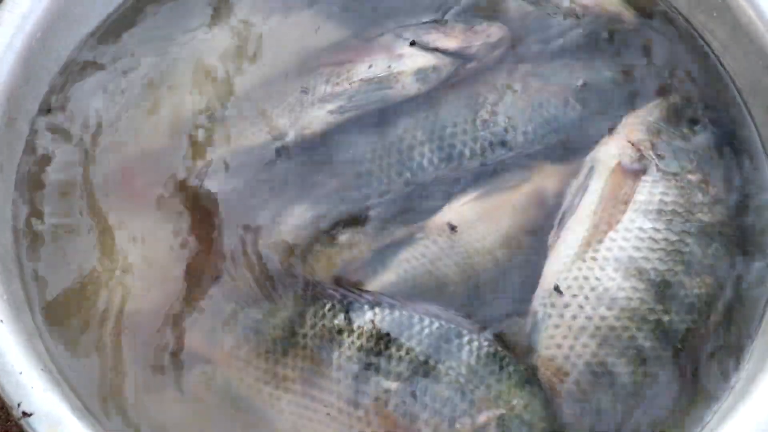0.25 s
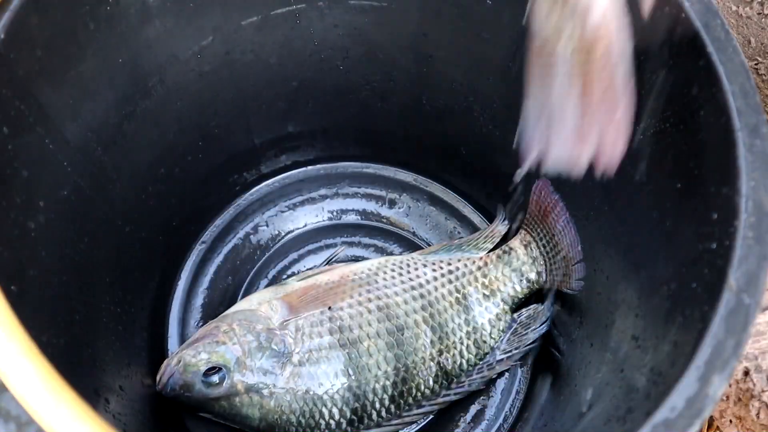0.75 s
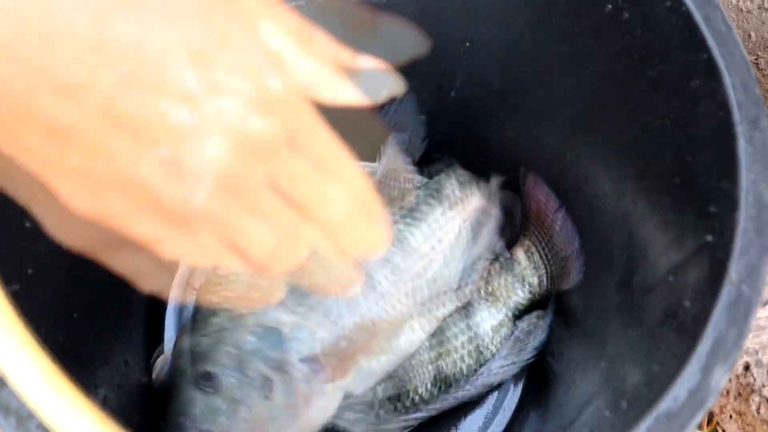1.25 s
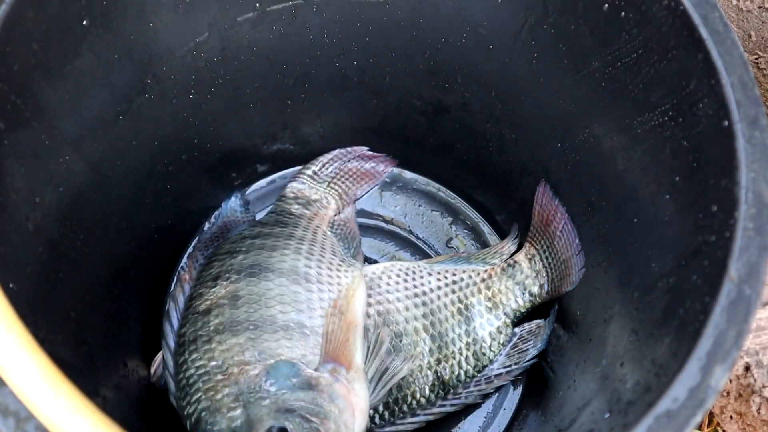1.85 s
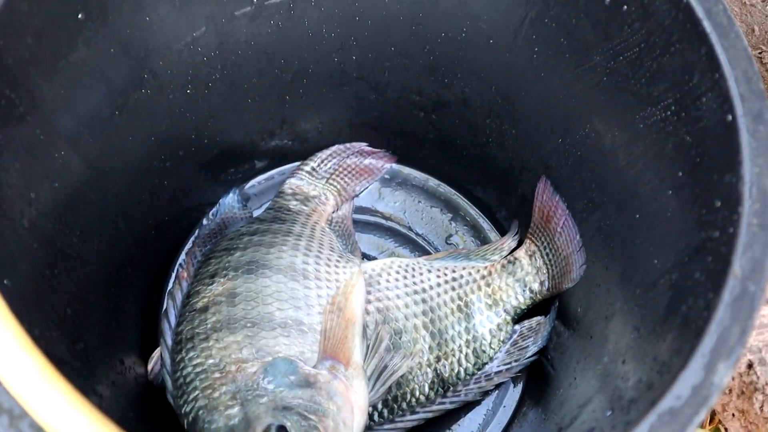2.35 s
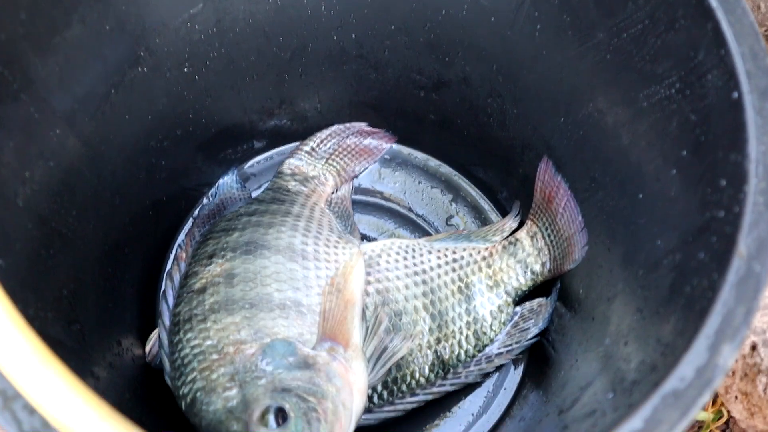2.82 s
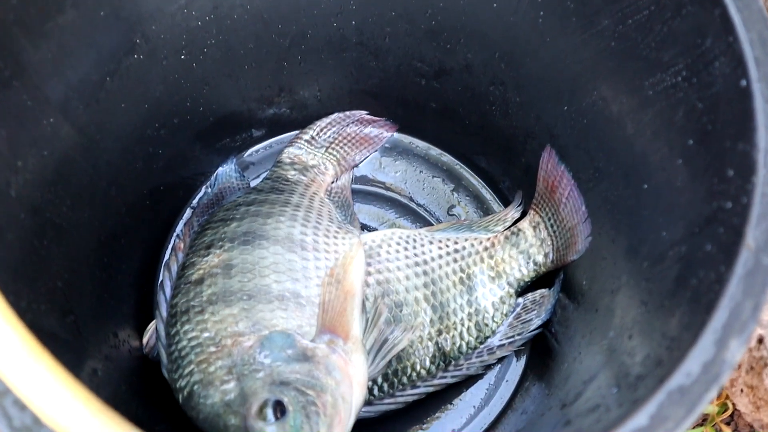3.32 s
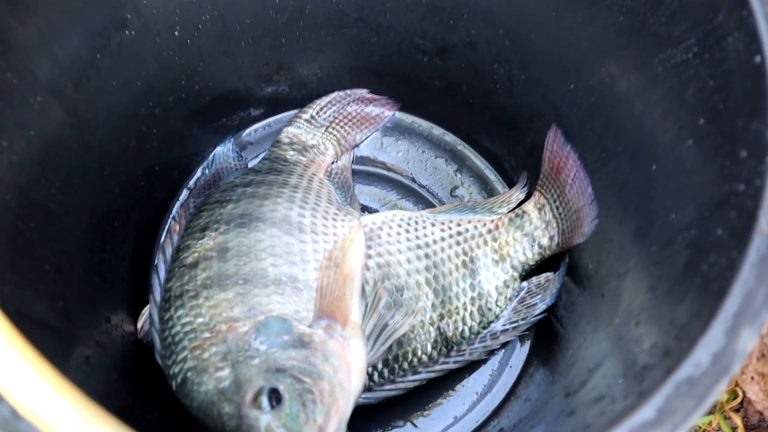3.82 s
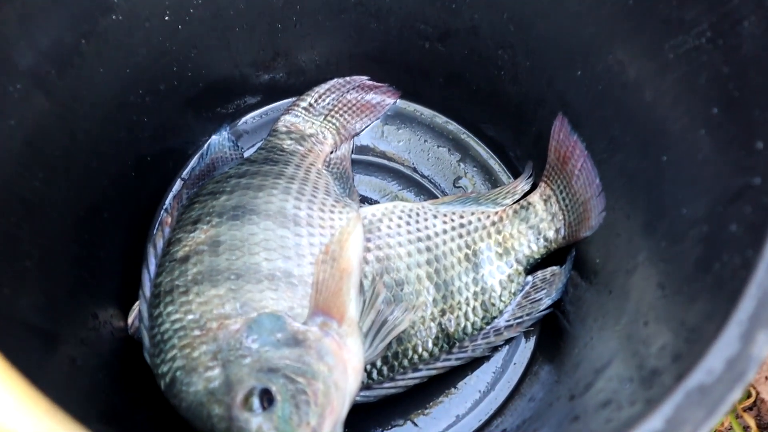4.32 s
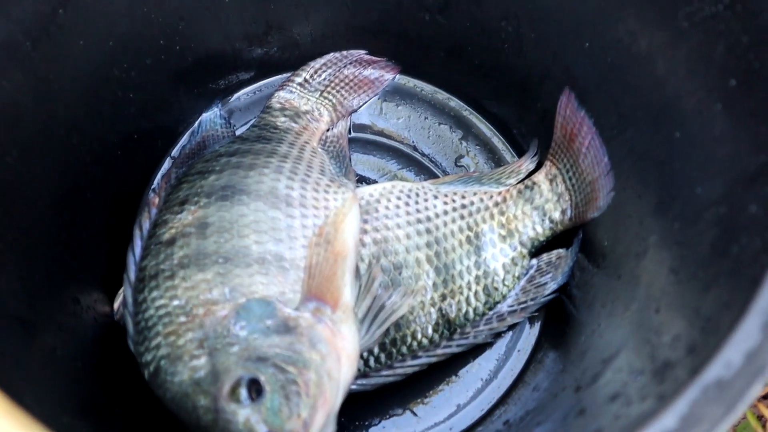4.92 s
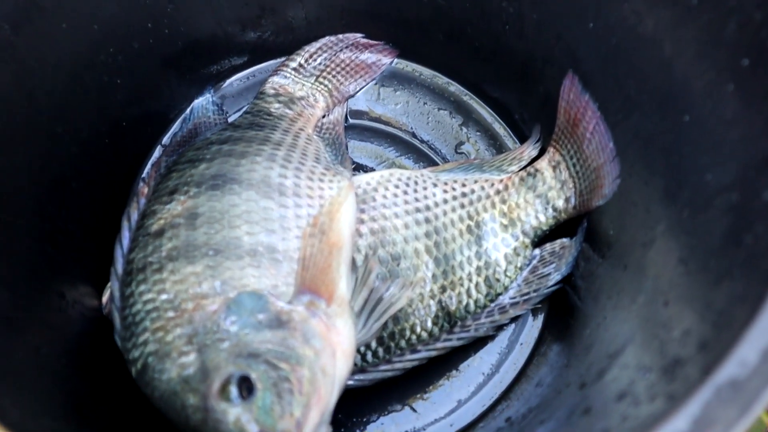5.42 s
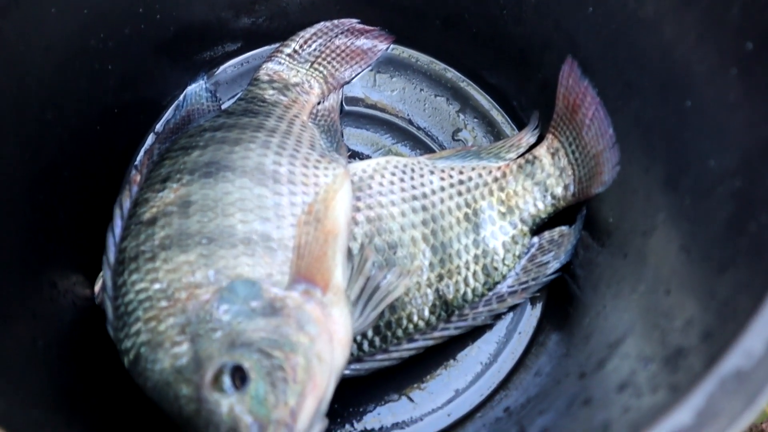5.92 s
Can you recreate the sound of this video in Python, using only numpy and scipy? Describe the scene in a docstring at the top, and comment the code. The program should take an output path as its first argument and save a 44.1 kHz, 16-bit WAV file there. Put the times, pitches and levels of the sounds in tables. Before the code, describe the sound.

Close stereo microphone over live fish outdoors. Soft rumble and hiss stay underneath. After a nearly quiet start with a fading whine, slimy froth leads to one heavy wet slap on a plastic bucket bottom, briefly hollow and ringing. Then come sparse sticky lip smacks, sputtering suction, little rising bubble plinks and crisp prickles, with a strong juicy squelch midway and another wet smack near the end.

```python
"""Outdoors a low rumble and a thin hiss (filtered noise) run throughout; a thin whine soon fades. Live fish
in a basin smack faintly, then the scene cuts to a wet plastic bucket: slime sucks (gated froth), small
bubbles plink or rise (gliding sines). A fish slithers in onto another, slaps the bottom (modes, splatter,
bursting water) and bounces. Then gills and mouths smack (resonated clicks), squelch, suck air and prickle;
late on comes another wet slap."""
import sys
import numpy as np
from scipy import signal
from scipy.fft import rfft, irfft, next_fast_len
from scipy.io import wavfile
from scipy.ndimage import uniform_filter1d

SR = 44100
rng = np.random.default_rng(int(sys.argv[2]) if len(sys.argv) > 2 else 0)


def master_out(mix):
    """Clip the mix to full scale and print it as 16-bit PCM to the path in sys.argv[1]."""
    frames = np.transpose(np.atleast_2d(mix))
    ceiling = np.clip(frames, -1, 1)
    pcm = np.round(ceiling * 32767).astype(np.int16)
    wavfile.write(sys.argv[1], SR, pcm)


N = 272097
T = np.arange(N) / SR
SHORT = T[:SR // 2]
CUT_S = 0.73  # cut from the basin to the bucket


def undb(db):
    """Decibels to gain."""
    return 10 ** (np.asarray(db) / 20)


def unit(x):
    """Scale to rms 1."""
    return x / np.sqrt(np.mean(x ** 2))


def over_bins(points, size):
    """Interpolate a (Hz, value) table over log frequency at every FFT bin."""
    hz, value = np.transpose(points)
    return np.interp(np.log(np.fft.rfftfreq(size, 1 / SR) + 1), np.log(hz), value)


def colour(x, points):
    """Minimum-phase filter from a (Hz, dB) table: causal, so attacks stay sharp."""
    size = next_fast_len(x.shape[-1] // 2 + 4096) * 2
    cepstrum = irfft(np.log(undb(over_bins(points, size))))
    cepstrum[1:size // 2] *= 2
    cepstrum[size // 2 + 1:] = 0
    response = np.exp(rfft(cepstrum))
    return irfft(rfft(x, size) * response)[..., :x.shape[-1]]


def lowpass(x, order, hz):
    """Butterworth low-pass."""
    return signal.lfilter(*signal.butter(order, hz, fs=SR), x)


def highpass(x, hz):
    """First-order high-pass."""
    return signal.lfilter(*signal.butter(1, hz, "high", fs=SR), x)


def resonate(x, hz, width_hz):
    """One resonance, gain 1 at its centre; centre and width stop at SR / 3."""
    hz = min(hz, SR / 3)
    return signal.lfilter(*signal.iirpeak(hz, hz / min(width_hz, SR / 3), fs=SR), x)


def fade(t60_s):
    """Exponential decay, 60 dB in t60_s."""
    return np.exp(-np.log(1000) * SHORT / t60_s)


def crackle(count, rate_hz, spread_db):
    """Random tiny clicks of uneven size and sign, rms 1."""
    sizes = undb(spread_db * np.minimum(rng.exponential(size=count), 4))
    signs = rng.choice([-1, 1], count)
    return unit(signs * sizes * (rng.random(count) < rate_hz / SR))


def add(out, start_s, x):
    """Mix x into out from start_s."""
    start = int(start_s * SR)
    out[start:start + len(x)] += x[:N - start]


def ports(x, lead):
    """Two microphone ports: the left leads the right by a frequency-dependent phase."""
    turn = np.exp(.5j * over_bins(lead, N) * np.array([[1], [-1]]))
    return irfft(rfft(x) * turn, N)


def air(spectrum, db, flutter_db=-0.44, diffuse=0.74):
    """Outdoor noise: an unsteady rumble alike at both ports under a partly diffuse hiss."""
    # left port's lead on the background: (frequency [Hz], phase [rad])
    far_lead = [(40, .05), (200, .3), (430, 1.5), (900, 2.1), (1800, 1.8), (3000, 2.3), (5000, 2.7),
                (9000, 3.0)]
    apart = highpass(rng.standard_normal((2, N)), 450)
    noise = ports(rng.standard_normal(N), far_lead) + diffuse * apart
    knots_s = np.linspace(0, T[-1], 90)
    flutter = undb(flutter_db * np.interp(T, knots_s, rng.standard_normal(len(knots_s))))
    sound = unit(colour(noise, spectrum))
    rumble = lowpass(sound, 1, 300)
    return undb(db) * (sound + (flutter - 1) * rumble)


def insect(start_hz=4250, rise_hz=260, width_hz=60, db=-60.5, fade_s=0.31):
    """A thin whine, a noise-modulated sine, creeps upward and fades."""
    noise = rng.standard_normal((2, N))
    band = signal.sosfilt(signal.butter(2, width_hz / 2, fs=SR, output="sos"), noise)
    hz = start_hz + rise_hz * np.minimum(T / CUT_S, 1)
    carrier = np.sin(2 * np.pi * np.cumsum(hz) / SR)
    return undb(db) * unit((1 + unit(band)) * carrier) * np.exp(-(T / fade_s) ** 2)


def snap(hz, width_hz, t60_s, crackle_share):
    """A film breaks with a click and tears on in smaller ones; the cavity colours them. Peak 1."""
    tear = crackle_share * crackle(len(SHORT), rate_hz=7000, spread_db=3.5) * fade(t60_s)
    tear[0] = 1
    stage_hz = 0.86 * width_hz
    x = resonate(resonate(tear, hz, stage_hz), hz, stage_hz)
    return x / np.abs(x).max()


def smacks(trim_db=5, tear_cycles=215):
    """Slime films snap as lips and gill covers part; bigger cavities tear on longer."""
    # slime films: (time [s], level before trim [dB], cavity [Hz], width before snap's narrowing [Hz])
    films = [(.278, -44.5, 2330, 1200), (0.56, -41, 2160, 900), (1.013, -32, 3400, 2500),
             (1.021, -32, 2420, 2000), (1.074, -34, 3140, 1800), (1.367, -18, 5970, 2200),
             (1.37, -31, 2680, 1000), (1.3827, -33, 5550, 2200), (1.400, -17, 4370, 2000),
             (1.452, -22.5, 1960, 3480), (2.243, -29, 2310, 2100), (2.413, -13.5, 2310, 1890),
             (2.478, -26, 2610, 3420), (2.668, -32, 1990, 2980), (3.321, -30.5, 2400, 2400),
             (3.389, -29, 3200, 1100), (3.456, -38, 2000, 2200), (3.511, -33, 3260, 1500),
             (3.614, -29.5, 1730, 1390), (3.708, -32, 2100, 905), (4.948, -31, 1530, 1400),
             (5.108, -37.5, 2740, 1008), (5.142, -24.5, 4970, 3020), (5.162, -13, 7360, 5900),
             (5.167, -22, 3500, 2180), (5.391, -29.5, 4550, 1200), (6.115, -34.5, 2650, 900)]
    out = np.zeros(N)
    for start_s, db, hz, width_hz in films:
        add(out, start_s, undb(db + trim_db) * snap(hz, width_hz, tear_cycles / hz, crackle_share=0.083))
    return out


def suction(sputter_db=1.0, seep_db=-63, bright_hz=2180):
    """Air sputters through a wet slit as froth and ringing tiny bubbles; a little seeps between strokes."""
    # colour of the hollow behind the slit: (frequency [Hz], level [dB])
    gill = [(200, -14.5), (450, -15.5), (720, -11.5), (1150, -7), (1800, 4.5), (2150, -0.5), (2650, -8),
            (3300, -2), (4600, -9), (7000, -11.5), (10500, -11.5), (12300, -19), (15000, -51)]
    # gill and skin strokes, tighter slits brighter:
    # (time [s], attack [s], hold [s], level [dB], gain on the bright part [dB])
    strokes = [(0.757, 0.044, 0.016, -51, -5), (0.895, 0.066, 0.13, -44.5, -1),
               (1.201, 0.035, 0.081, -36.5, 2), (1.44, 0.026, 0.051, -49, -8),
               (1.874, 0.085, 0.066, -40, -7), (2.234, 0.0041, 0.083, -38.5, 2),
               (2.412, 0.006, 0.12, -33, -3), (2.66, 0.044, 0.048, -47.5, 0),
               (3.045, 0.13, 0.018, -44.5, -1), (3.293, 0.067, 0.11, -41.5, -6.5),
               (3.722, 0.15, 0.048, -40.5, -5), (4.04, .03, 0.075, -48, 2.5),
               (4.938, 0.022, 0.024, -49, 2.5), (5.172, 0.011, 0.043, -44.5, 7),
               (5.235, 0.0096, 0.083, -28.5, -0.5), (5.317, 0.093, 0.072, -33.5, 0),
               (5.497, 0.048, 0.038, -37.5, -1.5), (5.642, 0.19, 0.045, -40, -6)]
    blips = sum(resonate(crackle(N, rate_hz=90, spread_db=2.0), hz, hz / 12)
                for hz in np.geomspace(1200, 9000, 18))
    fine = unit(colour(crackle(N, rate_hz=9000, spread_db=2.0), gill))
    froth = unit(fine + .5 * unit(colour(blips, gill)))
    sputter = undb(sputter_db * unit(uniform_filter1d(rng.standard_normal(N), size=700)))
    dull = lowpass(froth, 1, bright_hz)
    bright = froth - dull
    dull_power = bright_power = undb(seep_db) ** 2 * (T > CUT_S)
    for start_s, attack_s, hold_s, db, bright_db in strokes:
        flow = undb(db) * stroke(start_s, attack_s, hold_s)
        dull_power = dull_power + flow ** 2
        bright_power = bright_power + (undb(bright_db) * flow) ** 2
    return sputter * (dull * np.sqrt(dull_power) + bright * np.sqrt(bright_power))


def stroke(start_s, attack_s, hold_s, sag_db_per_s=47, release_db_per_s=253):
    """Air flow of one stroke: builds, slackens, then the slit closes and adds the release to the sag."""
    held_s = np.maximum(T - start_s - attack_s, 0)
    loss_db = sag_db_per_s * held_s + release_db_per_s * np.maximum(held_s - hold_s, 0)
    return np.clip((T - start_s) / attack_s, 0, 1) * undb(-loss_db)


def bubble(start_hz, end_hz, length_s, waver=0.046, damping=1.0):
    """A pocket of air rings, wavering and gliding as its size changes."""
    age = np.linspace(0, 1, int(length_s * SR))
    wobble = unit(uniform_filter1d(rng.standard_normal(2048), size=60))
    hz = start_hz * (end_hz / start_hz) ** age * (1 + waver * np.resize(wobble, len(age)))
    swell = np.minimum(age / 0.13, 1) * np.exp(-damping * age) * np.minimum((1 - age) / 0.071, 1)
    return swell * np.sin(2 * np.pi * np.cumsum(hz) / SR)


def tick(hz):
    """A scale or fin ray comes unstuck: a very short snap. Peak 1."""
    return snap(hz, 0.94 * hz, t60_s=0.027, crackle_share=0.17)


def prickle(quiet_db=-46, range_db=8, cycles=22, glide=1.114, low_hz=2100, octaves=2.5,
            tick_share=0.38, tick_low_hz=4500, tick_db=4):
    """Pinhead bubbles burst in slime as short upward blips among small ticks; most are faint."""
    # how busy the slime is: (time [s], rate [events/s])
    busyness = [(.7, 0), (1.2, 70), (1.65, 5), (3.2, 8), (4.1, 80), (4.35, 35), (6.1, 69.5)]
    out = np.zeros(N)
    due = np.cumsum(np.interp(T, *np.transpose(busyness))) / SR  # events expected so far
    for k, (when, pitch, size, kind) in enumerate(rng.random((400, 4))[:int(due[-1])]):
        hz = low_hz * 2 ** (octaves * pitch)
        if kind < tick_share:
            sound = undb(tick_db) * tick(tick_low_hz * 2 ** pitch)
        else:
            sound = bubble(hz, glide * hz, cycles / hz, damping=2.2)
        start_s = np.interp(k + when, due, T)
        add(out, start_s, undb(quiet_db + range_db * size ** 2) * sound)
    return out


def bubbles(trim_db=3):
    """Clear bubbles, squeezed by the slime, glide in pitch; nearly all rise."""
    # (time [s], length [s], start [Hz], end [Hz], level before trim [dB])
    glides = [(0.946, 0.0069, 2800, 3150, -34), (0.953, 0.036, 730, 600, -43),
              (0.964, .012, 2940, 3500, -35), (1.213, .024, 1150, 1660, -32.5),
              (1.253, .025, 1550, 2010, -31.5), (2.691, 0.03, 1495, 1880, -38.5),
              (2.715, 0.016, 2370, 3200, -33), (3.823, 0.032, 860, 1090, -39.5),
              (3.862, 0.013, 1075, 1280, -34.5), (4.077, 0.015, 1840, 1740, -35),
              (4.103, 0.016, 1486, 1960, -39), (4.31, .047, 1120, 2320, -41),
              (4.948, 0.0133, 638, 725, -28.5), (4.956, .022, 825, 1160, -35.5),
              (4.971, .008, 1600, 2110, -30.5), (4.98, 0.02, 1324, 2350, -30),
              (4.986, 0.019, 1000, 1200, -38), (5.041, .018, 1860, 2500, -43)]
    out = np.zeros(N)
    for start_s, length_s, start_hz, end_hz, db in glides:
        add(out, start_s, undb(db + trim_db) * bubble(start_hz, end_hz, length_s))
    return out


def pockets():
    """Air trapped under a fish and in the slime plinks at an almost steady, slightly falling pitch."""
    # (time [s], start [Hz], length [s], level [dB])
    plinks = [(0.953, 2130, 0.029, -34), (1.074, 2950, 0.0067, -38), (1.205, 6040, .006, -32.5),
              (1.294, 1180, 0.02, -28), (1.339, 604, 0.0035, -1), (1.3439, 2370, 0.0044, 1.5),
              (1.348, 2325, 0.016, -17), (1.349, 493, 0.0082, -17.5), (1.3561, 1006, 0.0054, -5),
              (1.359, 313, 0.0207, -11.5), (1.3949, 1134, 0.007, -9), (1.395, 228, 0.0137, -12),
              (1.398, 743, 0.019, -19), (2.671, 1250, 0.015, -32), (2.727, 1720, 0.028, -33.5),
              (2.838, 1690, .014, -40), (3.393, 3140, 0.012, -24), (3.609, 1584, 0.052, -33),
              (4.166, 4070, 0.0065, -35), (4.1869, 1070, 0.018, -37.5), (4.2323, 3220, .007, -37),
              (4.256, 3350, .008, -40), (4.4914, 3320, 0.0089, -40), (4.542, 1820, 0.01, -40),
              (4.596, 3650, 0.0056, -36.5), (5.067, 2360, 0.016, -35.5), (5.118, 1840, 0.01, -36),
              (5.183, 860, 0.0087, -28.5), (5.205, 1930, 0.0056, -24), (5.714, 4300, 0.0061, -31),
              (5.806, 1108, 0.024, -28.5), (5.834, 1570, 0.011, -27.5), (5.845, 1493, 0.018, -28),
              (5.866, 5200, 0.0045, -33.5), (5.936, 2470, 0.0033, -28.5), (5.997, 3060, 0.0057, -34.5),
              (6.008, 3860, 0.0083, -33.5), (6.062, 3380, 0.0089, -32.5), (6.132, 6280, 0.0049, -33)]
    out = np.zeros(N)
    for start_s, hz, length_s, db in plinks:
        add(out, start_s, undb(db) * bubble(hz, 0.945 * hz, length_s, waver=0.015, damping=2.42))
    return out


def blows(trim_db=-3, splat_cycles=63):
    """Soft bodies set the bucket ringing and squirt water out; softer contacts ring duller, smear longer."""
    # bodies striking the bucket: (time [s], thud before trim [dB], contact bandwidth [Hz], splat [dB])
    hits = [(0.996, -37, 904, -48), (1.178, -33, 580, -32.5), (1.233, -24, 280, -42),
            (1.288, -23, 250, -29), (1.3378, -15.5, 1970, -8), (1.3476, -22, 1300, -13.5),
            (1.3507, -19.5, 1700, -11.5), (1.3565, -15, 890, -17), (1.395, -29.5, 970, -18.5),
            (1.4513, -31, 1980, -25), (1.4569, -45, 1500, -27), (1.553, -43, 900, -32.5),
            (1.571, -38, 400, -32), (1.582, -33, 900, -35.5), (2.399, -50, 1290, -24),
            (2.449, -45, 900, -32), (2.478, -38.5, 1100, -27), (5.158, -35, 1080, -18),
            (5.466, -35, 630, -38)]
    # modes of the loaded bucket: (frequency [Hz], level [dB], t60 [s])
    bucket = [(105.4, -5.5, 0.11), (212, -6.5, 0.16), (265.8, -2, 0.16), (314, -2, 0.068), (616, 3, 0.052),
              (732, -5, 0.088), (845, -4.5, 0.057), (990, 3, 0.01), (1037, -4, 0.18), (1093, -5, 0.16),
              (1210, -15, 0.08), (2140, 11.5, 0.0046)]
    # colour of the squirting water: (frequency [Hz], level [dB])
    splat_colour = [(60, 16.5), (250, -12.5), (700, 0.5), (1200, -2.5), (2000, -3.5), (3500, -9.5),
                    (7000, -20.5), (10000, -9), (11500, -14), (15000, -43)]
    out = np.zeros(N)
    ring = np.zeros(len(SHORT))
    for k, (hz, db, t60_s) in enumerate(bucket):
        ring += (-1) ** k * undb(db) * fade(t60_s) * np.sin(2 * np.pi * hz * SHORT)
    for start_s, thud_db, contact_hz, splat_db in hits:
        thud = lowpass(ring, 2, contact_hz)
        spray = unit(colour(crackle(len(SHORT), rate_hz=9000, spread_db=4.0), splat_colour))
        splat = spray * fade(splat_cycles / contact_hz)
        add(out, start_s, undb(thud_db + trim_db) * thud + undb(splat_db) * splat)
    return out


def landing():
    """Blows and air pockets, with the deep bass removed."""
    return signal.sosfilt(signal.butter(2, 70, "high", fs=SR, output="sos"), pockets() + blows())


def ticks(trim_db=6):
    """The clearest ticks of wet scales and fins."""
    # (time [s], level before trim [dB], pitch [Hz])
    clear_ticks = [(1.014, -26.5, 8000), (1.142, -30, 8200), (2.0395, -32.5, 4250), (2.663, -23.5, 10600),
                   (2.733, -30.5, 8900), (3.5167, -27.5, 7950), (3.614, -34, 5000), (3.699, -27.5, 5950),
                   (4.106, -28, 5550), (4.3816, -38, 4220), (4.511, -33.5, 8300), (4.8008, -30, 5700),
                   (4.895, -20, 10700), (4.9906, -28.5, 10400), (5.7483, -29, 10700), (5.8105, -26.5, 9700),
                   (6.031, -32.5, 7000), (6.134, -25, 7400)]
    out = np.zeros(N)
    for start_s, db, hz in clear_ticks:
        add(out, start_s, undb(db + trim_db) * tick(hz))
    return out


def squelches(attack_share=0.056, release_share=0.15, width_share=0.2):
    """Air forced through a wet gap: noise whose broad resonance glides as the gap changes size."""
    # (time [s], length [s], start [Hz], end [Hz], level [dB])
    gaps = [(1.224, 0.056, 1350, 1990, -37.5), (1.274, 0.062, 1604, 936, -38.5),
            (2.414, .028, 1853, 1948, -24.5), (2.471, 0.026, 3750, 2920, -35.5)]
    out = np.zeros(N)
    for start_s, length_s, start_hz, end_hz, db in gaps:
        age = np.linspace(0, 1, int(length_s * SR))
        noise = rng.standard_normal((2, len(SHORT)))
        rush = lowpass(noise, 2, width_share * start_hz / 2)[:, -len(age):]
        phase = 2 * np.pi * np.cumsum(start_hz * (end_hz / start_hz) ** age) / SR
        swell = np.minimum(age / attack_share, 1) * np.minimum((1 - age) / release_share, 1)
        band = unit(rush[0] * np.cos(phase) + rush[1] * np.sin(phase))
        add(out, start_s, undb(db) * swell * band)
    return out


def cracks():
    """Water sheets burst from under a flat flank or gill cover: a dense spit swells and dies in milliseconds."""
    # (time [s], swell [s], level [dB], centre [Hz], width of each of two resonances [Hz])
    sheets = [(1.3377, 0.0016, -10, 6300, 8100), (2.396, 0.003, -27.5, 4160, 6540),
              (2.4123, 0.00077, -19, 2570, 2950), (5.1583, 0.0014, -16.5, 7000, 5960),
              (5.804, 0.0043, -36.5, 2000, 2200)]
    out = np.zeros(N)
    for start_s, swell_s, db, hz, width_hz in sheets:
        noise = rng.standard_normal(len(SHORT))
        spray = unit(resonate(resonate(noise, hz, width_hz), hz, width_hz))
        age = SHORT / swell_s
        add(out, start_s, undb(db) * spray * (age * np.exp(1 - age)) ** 2)
    return out


def echoes(t60_s):
    """Decaying noise response from 1.5 ms on, different at each port, energy 1."""
    response = rng.standard_normal((2, len(SHORT))) * fade(t60_s) * (SHORT > .0015)
    return response / np.sqrt(np.sum(response ** 2, axis=1, keepdims=True))


def in_bucket(x, balance, hollow_db, wall_db=-8, wall_t60_s=0.14, tail_db=-21, tail_t60_s=0.28,
              hollow_width_hz=9):
    """The bucket's air hums along; quick reflections and a faint longer tail differ at each port."""
    # two close, beating pitches of the air in the bucket: [Hz]
    hollow_hz = (695.5, 725)
    # left port's lead on the fish: (frequency [Hz], phase [rad])
    near_lead = [(40, .02), (400, .15), (800, .55), (1900, .75), (3200, 1.25), (4800, 2.2), (7000, 1.6),
                 (10000, 2.0)]
    x = x + undb(hollow_db) * sum(resonate(x, hz, hollow_width_hz) for hz in hollow_hz)
    response = undb(wall_db) * echoes(wall_t60_s) + undb(tail_db) * echoes(tail_t60_s)
    scattered = highpass(x, 800)  # long waves are not scattered
    both = ports(x, near_lead) + signal.fftconvolve(scattered[None], response, axes=1)[:, :N]
    side_db = over_bins(balance, N) * np.array([[.5], [-.5]])
    return irfft(rfft(both) * undb(side_db), N)


def scene():
    """The fish over the outdoor background, which cuts, by a 20 ms crossfade, from basin to bucket."""
    # background beside the basin and beside the bucket: (frequency [Hz], level [dB])
    basin_air = [(20, -30), (50, -2.5), (90, 0), (170, -6.5), (350, -14.5), (900, -18.5), (1500, -24.5),
                 (3500, -28.5), (4300, -25.5), (6000, -34), (7800, -26.5), (9450, -17), (10100, -32.5),
                 (12000, -49)]
    bucket_air = [(20, -11), (50, -6), (110, -0.5), (190, -9), (350, -16), (900, -18), (1800, -23),
                  (3000, -26), (6500, -28), (8700, -20.5), (9600, -24), (11000, -33.5), (15000, -46)]
    # left over right, for the bucket's bottom and for the fish's mouths: (frequency [Hz], level [dB])
    landing_balance = [(400, -1.5), (900, -2), (2600, -2.5), (4800, 16), (7000, 16), (10000, -3)]
    mouth_balance = [(1800, 1), (3000, -3), (4800, 9), (7000, 1), (12000, -4)]
    at_bucket = np.clip((T - CUT_S) / .02 + .5, 0, 1)
    outdoors = np.sqrt(1 - at_bucket) * (air(basin_air, db=-41.5) + insect())
    outdoors += np.sqrt(at_bucket) * air(bucket_air, db=-41.5)
    fish = smacks() + suction() + prickle() + bubbles() + ticks() + squelches() + cracks()
    return (outdoors + in_bucket(landing(), landing_balance, hollow_db=-7)
            + in_bucket(fish, mouth_balance, hollow_db=6))


def record(dry, top_hz=15500):
    """Dull the top treble, clip at full scale and low-pass at top_hz."""
    # treble roll-off: (frequency [Hz], level [dB])
    treble_rolloff = [(10500, 0), (12000, -3), (13500, -10), (15500, -17)]
    heard = np.clip(colour(dry, treble_rolloff), -1, 1)
    return signal.sosfilt(signal.ellip(8, .2, 70, top_hz, fs=SR, output="sos"), heard)


dry = scene()
out = record(dry)
master_out(out)
```